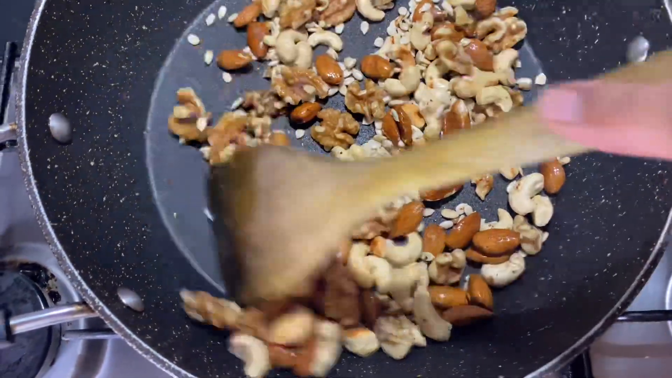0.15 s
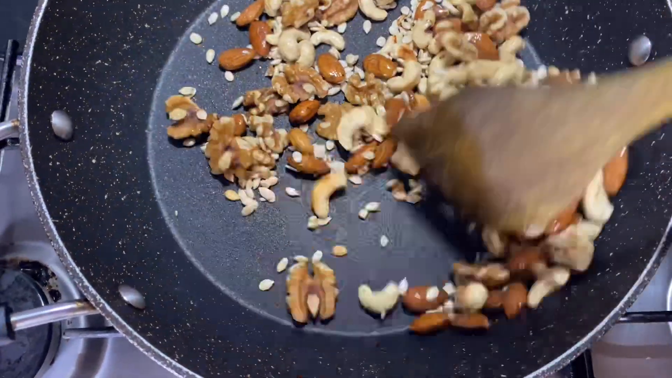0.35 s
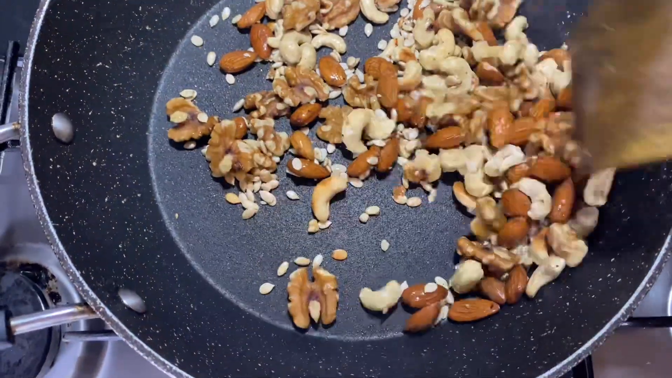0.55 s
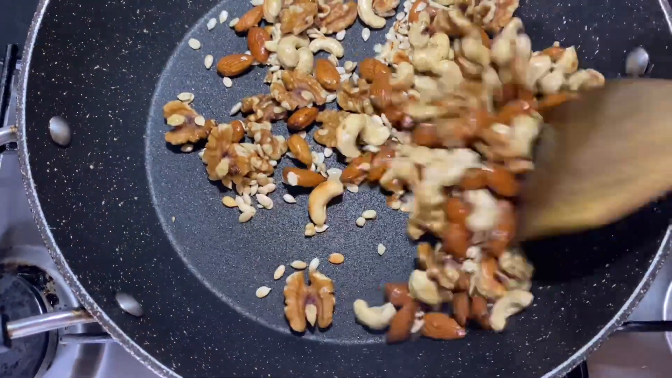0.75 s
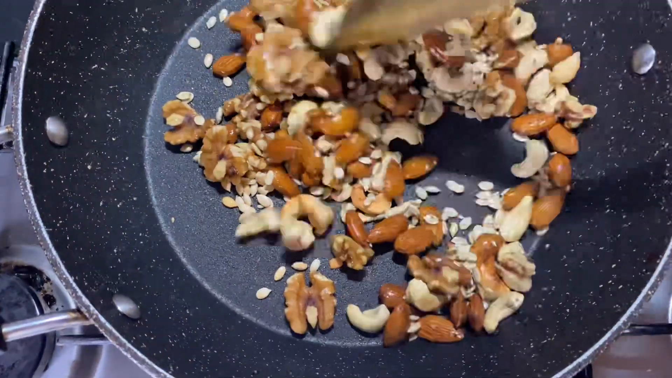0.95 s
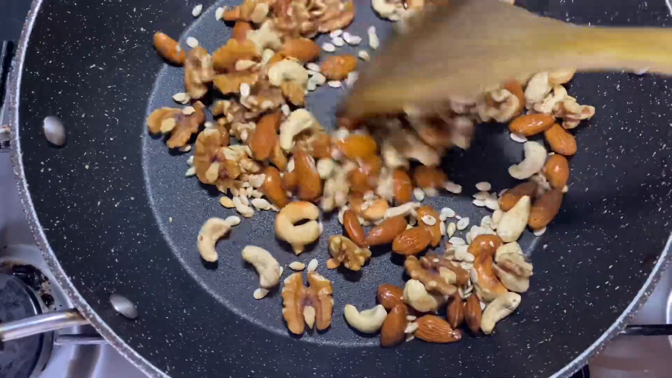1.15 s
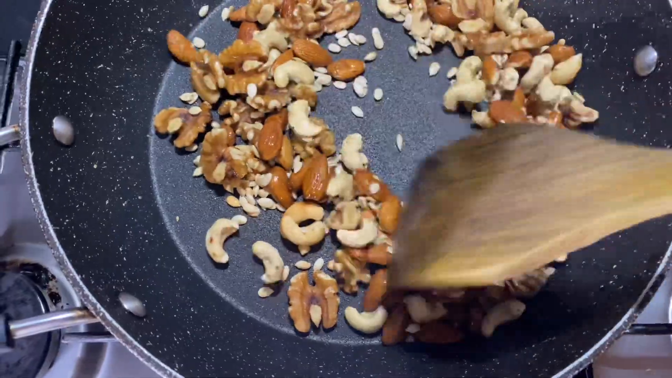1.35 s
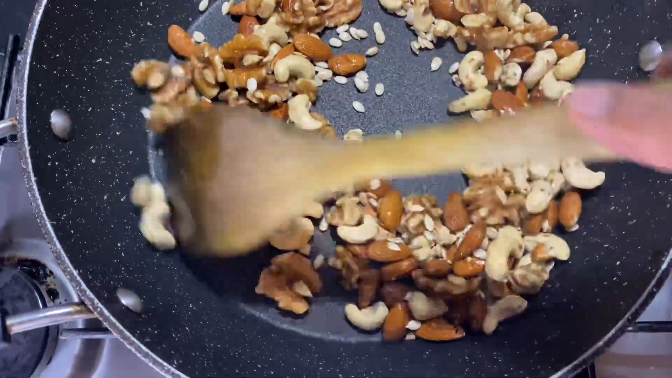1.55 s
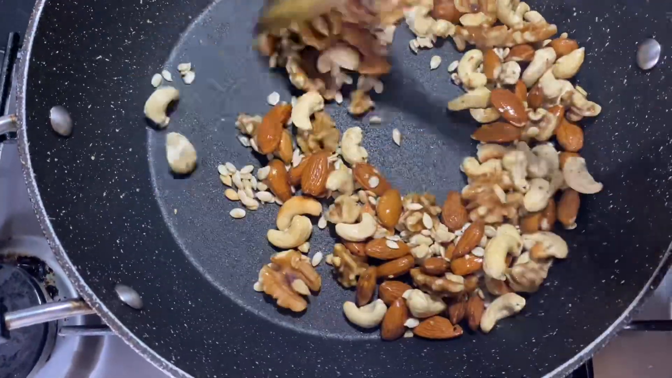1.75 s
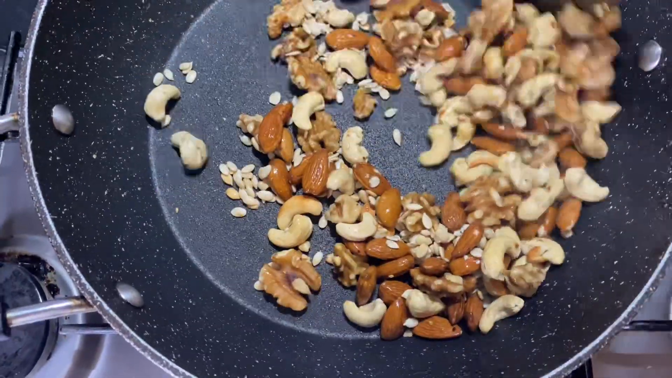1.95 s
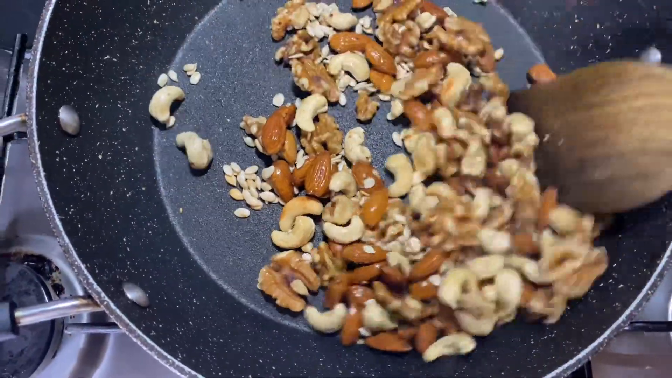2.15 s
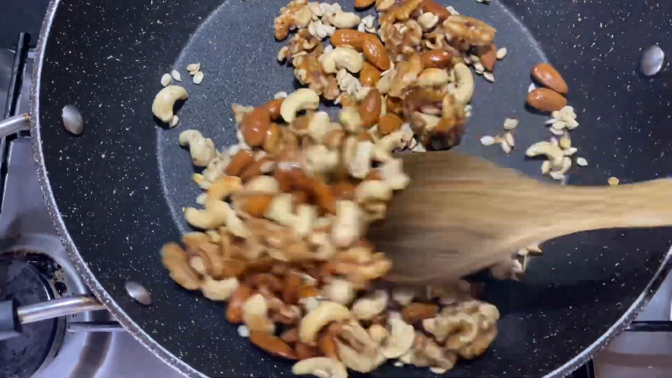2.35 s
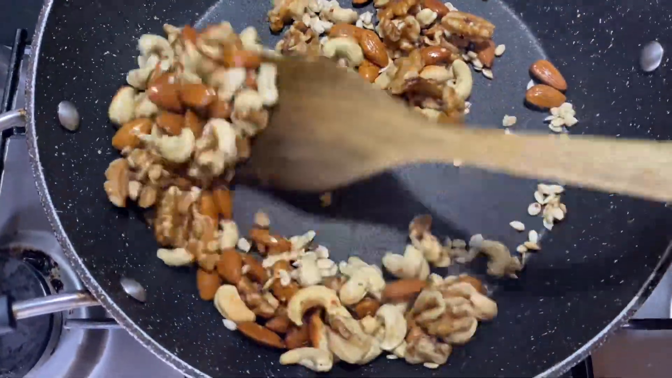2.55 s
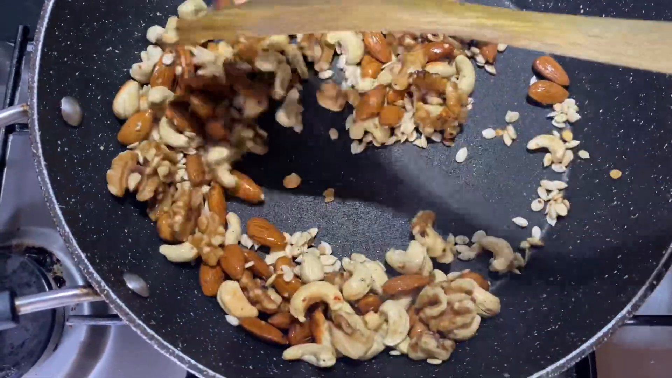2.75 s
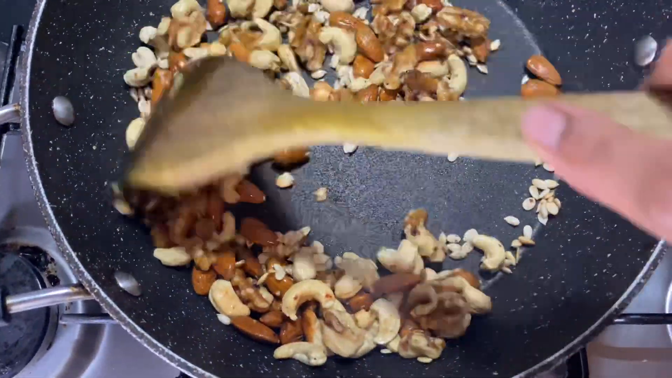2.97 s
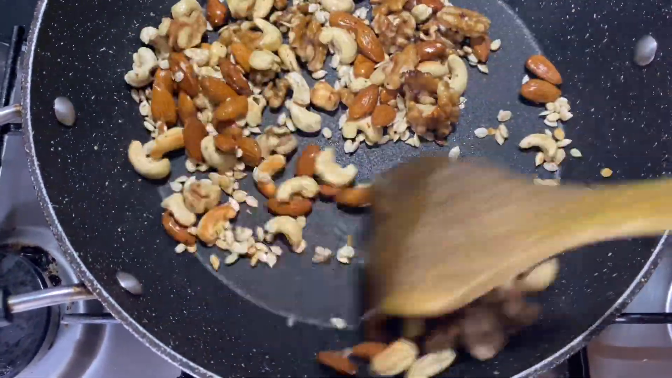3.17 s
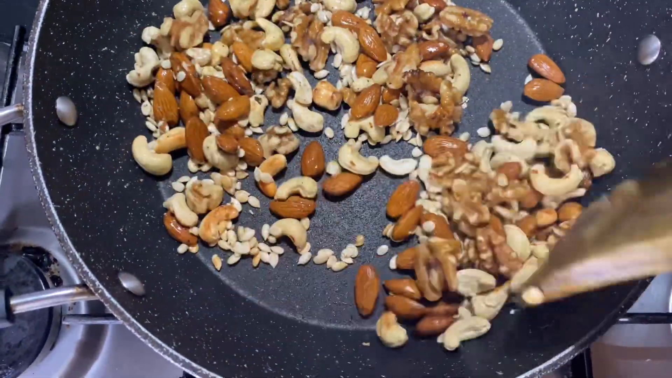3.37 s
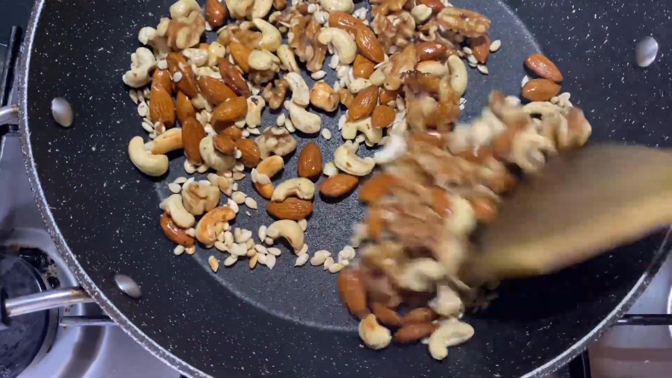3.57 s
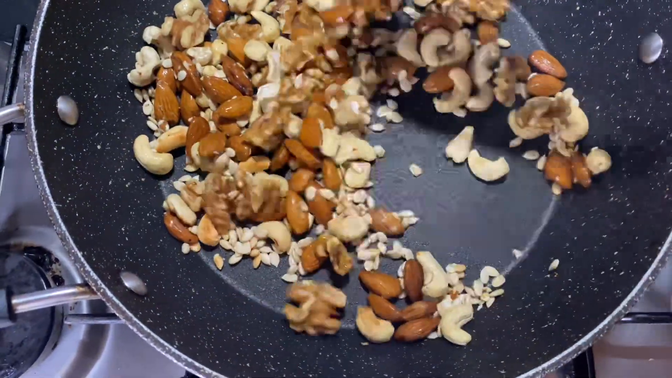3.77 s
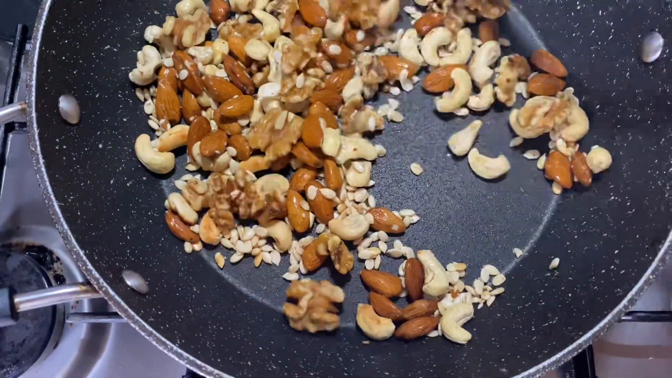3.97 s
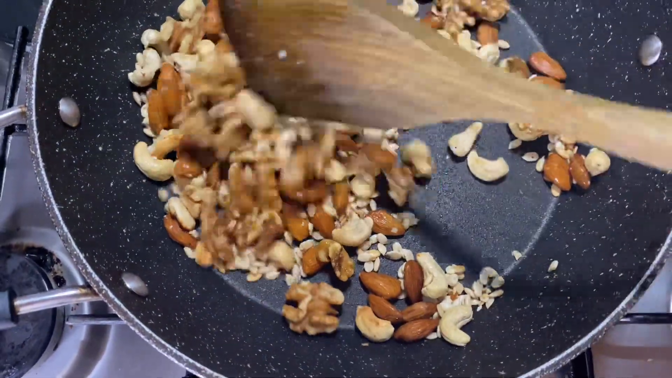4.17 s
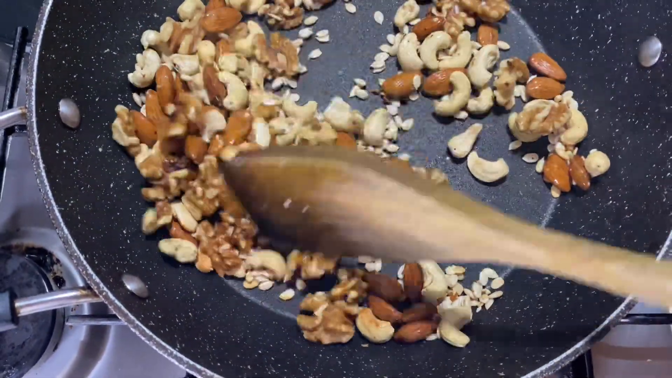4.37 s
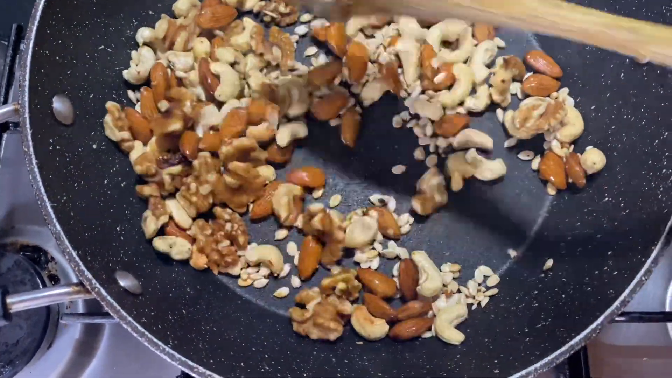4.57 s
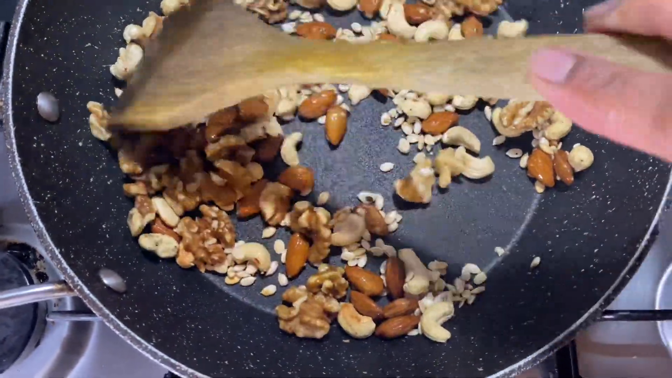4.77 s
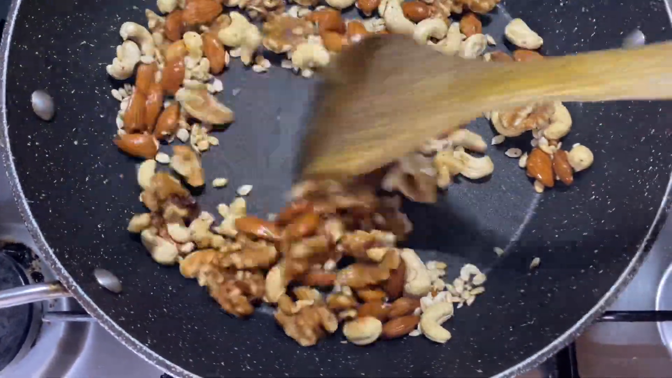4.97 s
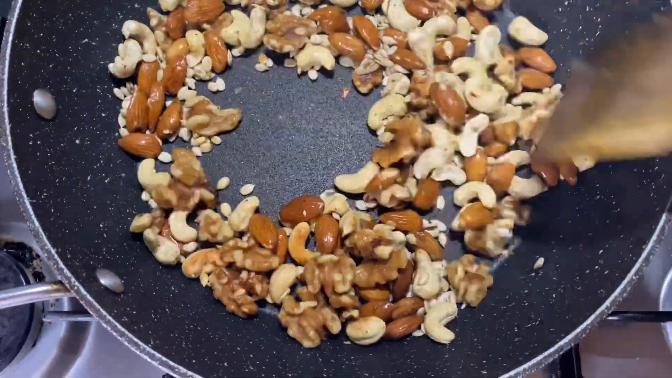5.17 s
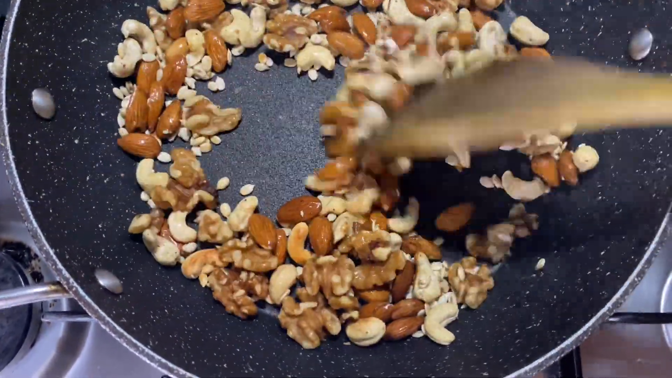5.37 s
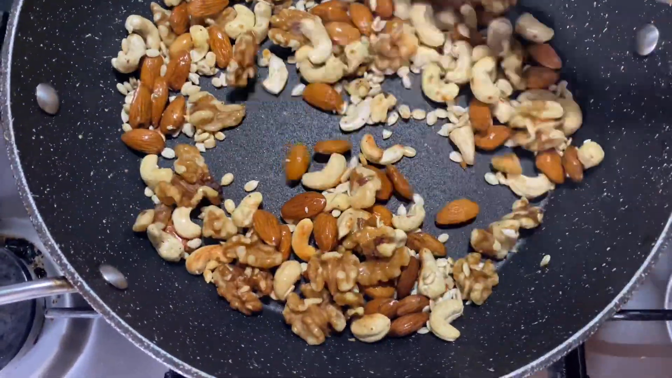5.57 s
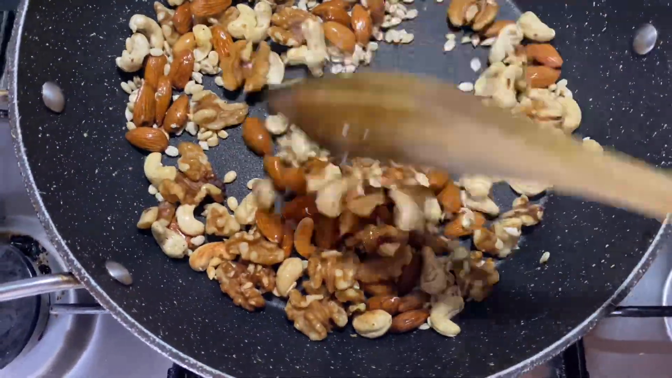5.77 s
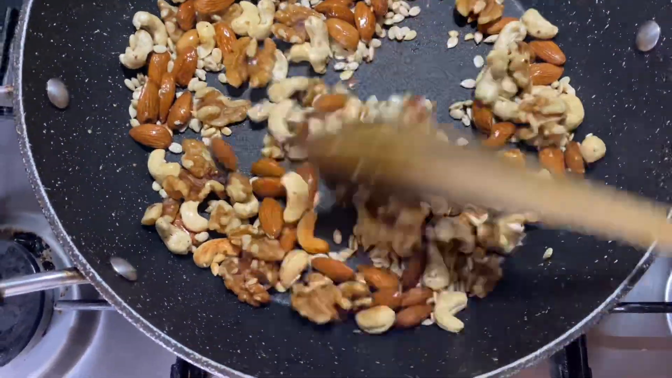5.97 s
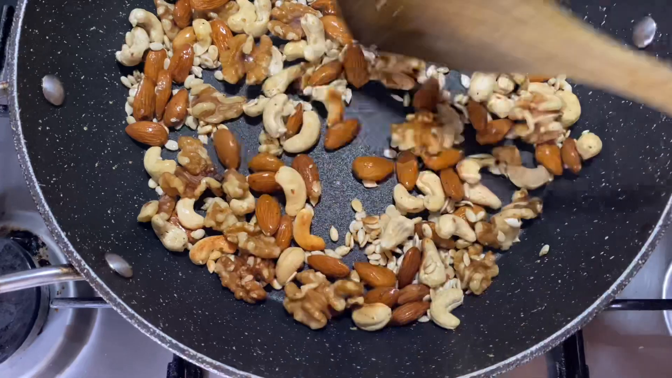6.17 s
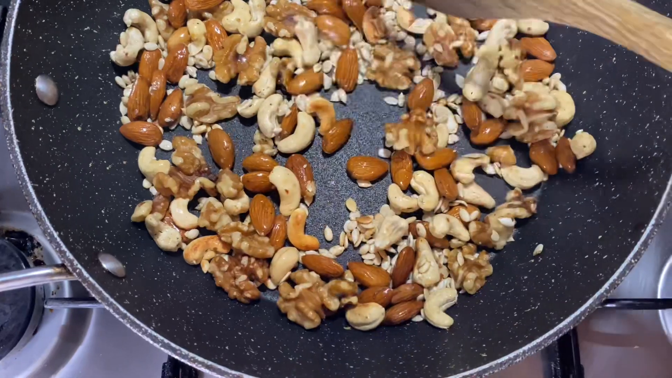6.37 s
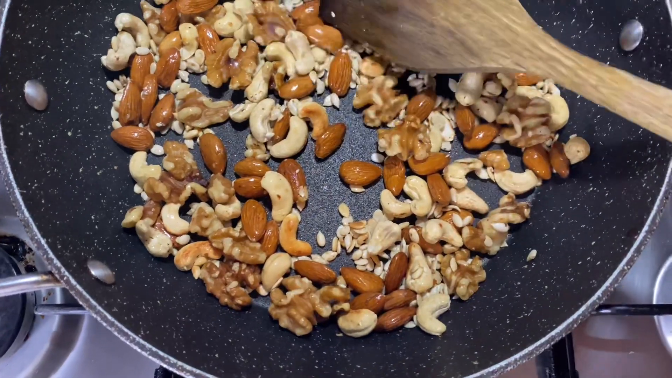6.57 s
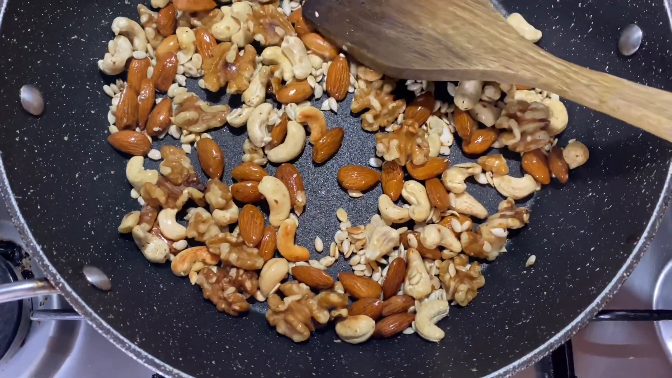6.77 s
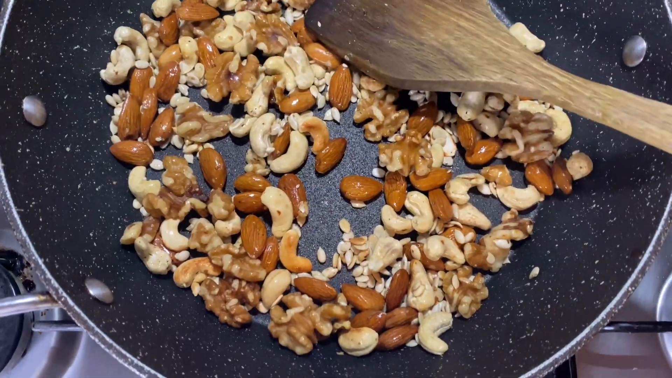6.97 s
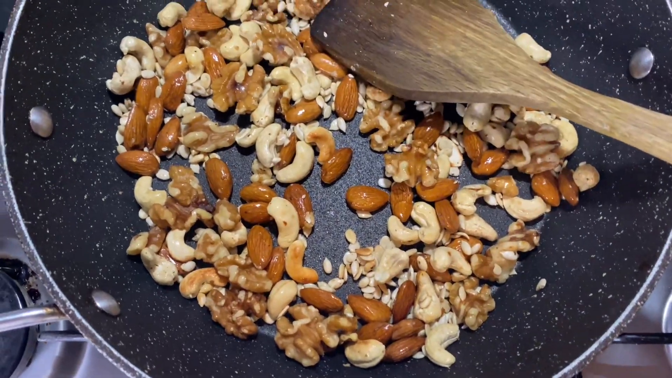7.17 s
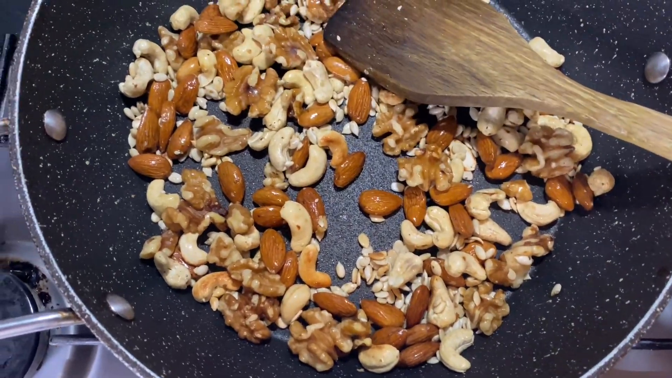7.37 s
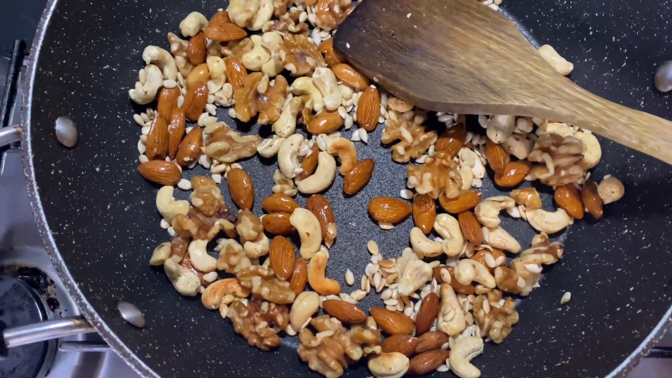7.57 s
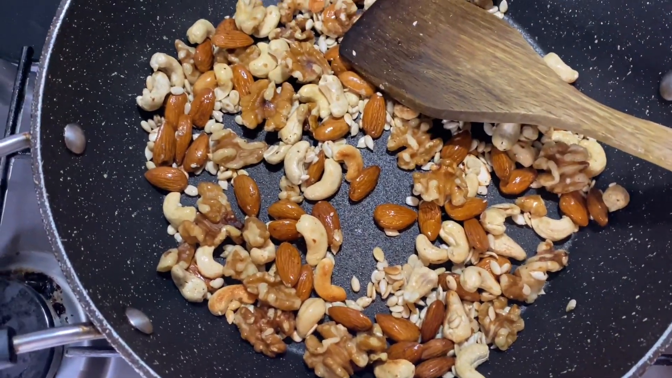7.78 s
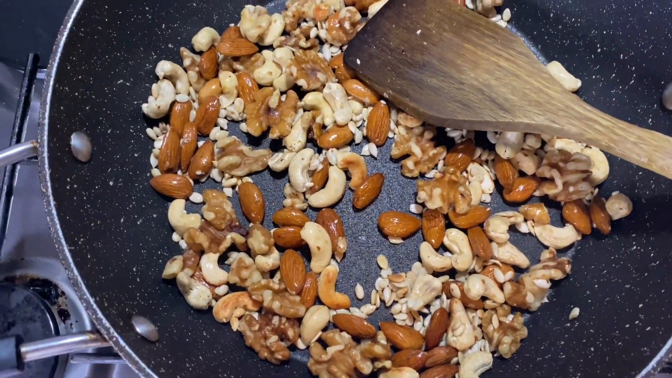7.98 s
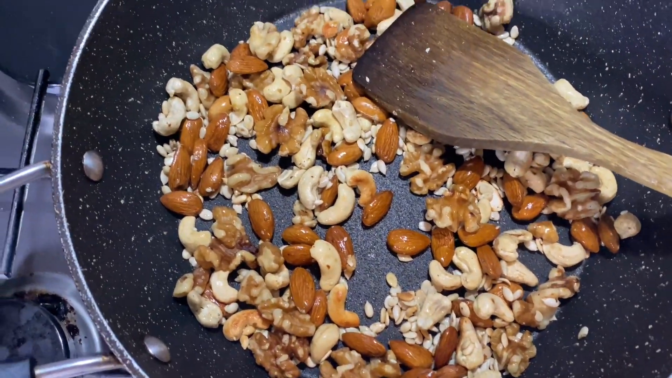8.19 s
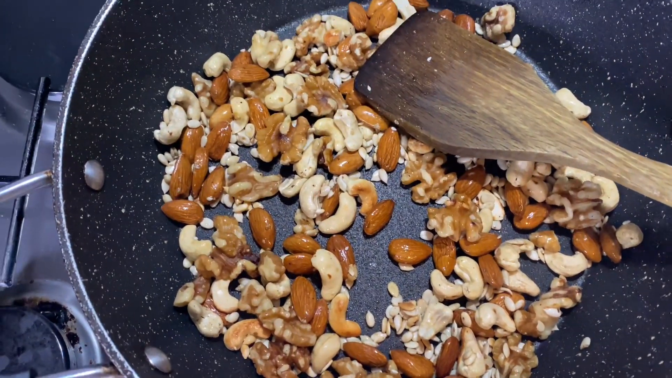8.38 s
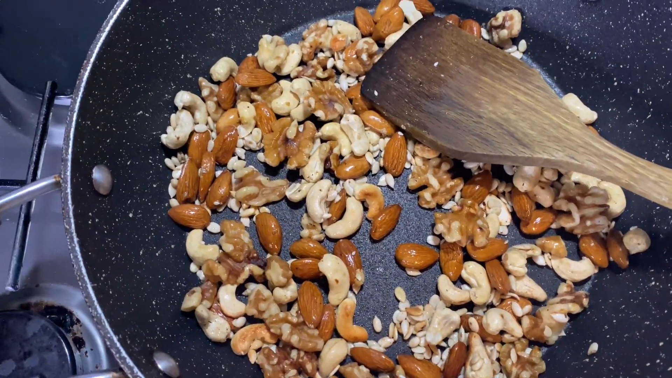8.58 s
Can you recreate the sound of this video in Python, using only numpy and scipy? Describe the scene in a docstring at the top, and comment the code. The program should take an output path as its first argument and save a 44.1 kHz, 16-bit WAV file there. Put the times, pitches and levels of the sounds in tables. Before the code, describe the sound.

Wood thuds and scrapes against a metal pan while hard nuts tumble and click together, heard very near with a short room echo. Busy stirring continues for over six seconds, with thin sizzling and tiny crackles. Several seeds pop with startlingly sharp, high cracks, the loudest overloading the microphone. Single nuts drop with hollow taps, the spatula is laid down, and only low rumble and faint hiss remain.

```python
"""In a small kitchen, close to a hot frying pan, a wooden spatula stirs nuts and seeds.
The spatula knocks as blows on the ringing modes of the pan; grains of contact make its scraping and the
tumbling nuts, while short hollow notes make single nuts land and click together. Dense tiny grains sizzle
faintly, noise bursts make crackles, sharp, bright seed snaps and two faint ticks; a low tone hums once.
A low rumble and thin hiss lie beneath; at the end the spatula is laid down in the pan."""
import sys
import numpy as np
from scipy import signal
from scipy.io import wavfile

SR = 44100
rng = np.random.default_rng(int(sys.argv[2]) if len(sys.argv) > 2 else 0)


def dump_mix(stems):
    """Bounce the given channels to the path in sys.argv[1] as a 16-bit WAV at rate SR."""
    frames = np.atleast_2d(stems).T  # one column per channel
    limited = np.clip(frames, -1, 1)  # hard clip at full scale
    pcm = np.round(limited * 32767).astype(np.int16)
    wavfile.write(sys.argv[1], SR, pcm)


N = 380583  # length of the scene in samples
AGE = np.arange(SR // 2) / SR  # time since a blow (s)
CUT_HZ = 16000  # upper limit of the recorded band

# Steady kitchen background. Each row: frequency in Hz, relative density in dB per Hz.
BACKGROUND_COLOUR = [(25, 11.5), (110, 4), (300, -0.5), (1000, -5), (2200, -9.5), (5000, -11), (9500, -8.5),
                     (12000, -4.5), (16000, -5.5)]
BACKGROUND_DB = -57.5
# Reverberation of the kitchen. Each row: frequency in Hz, decay time t60 in seconds.
KITCHEN_DECAY = [(100, .42), (500, .37), (2000, .36), (6000, .33), (12000, .31), (16000, .28)]

# Modes of the pan. Each row: frequency in Hz, decay time t60 in seconds, relative dB when struck on the
# floor, relative dB when struck on the wall.
PAN_MODES = [(116.8, 0.21, -14, -21), (146, 0.21, -16, -3), (305, 0.023, -6, -11.5), (526, 0.07, -1, 2),
             (553, 0.049, 2, -10), (620.7, 0.18, -4.5, -26), (722, .13, -10, -16.5), (835, 0.053, -10, 5),
             (932, .04, -18.5, -2), (1060, 0.19, -7.5, 1), (1114, .04, -9.5, -14), (1527, 0.15, -24, -3.5),
             (1528, .045, -21.5, -26.5), (1692, 0.09, -10, -12), (1858, 0.058, -13.5, -10),
             (2176, 0.13, -12.5, -55), (2280, .15, -23, -13), (2530, 0.22, -13, -24),
             (2550, 0.064, -23.5, -46), (2902, .05, -8.5, -43), (3244, 0.12, -34, -13),
             (3520, .04, -10.5, -16), (3960, 0.18, -18.5, -15), (4550, 0.15, -19.5, -33),
             (5585, 0.097, -22, -13.5)]
# Dead clatter of wood and nuts. Each row: frequency in Hz, relative density in dB per Hz.
CLATTER_COLOUR = [(40, -14), (130, -3), (210, -13.5), (330, 2), (600, 3.5), (1100, -3), (2000, -10),
                  (4000, -16.5), (7000, -20), (10000, -28), (16000, -25.5)]

# Strokes of the spatula through the heap. Each row: start in seconds, length in seconds,
# tumbling of the nuts in relative dB, initial pressure on the pan in relative dB.
STROKES = [(-.06, 0.42, -42.5, -42.5), (0.74, 0.2, -44.5, -44.5), (0.85, 0.045, -38.5, -34.5),
           (1.09, 0.22, -45.5, -54), (1.56, 0.65, -48.5, -46.5), (2.16, 0.37, -44, -48.5),
           (2.65, 0.14, -45.5, -62), (3.04, 0.28, -48.5, -50), (3.59, 0.14, -36, -37),
           (4.0, 0.13, -44, -44.5), (4.3, 0.38, -48, -57.5), (4.814, .25, -47, -51),
           (5.3, 0.51, -46, -50.5), (5.89, 0.26, -46, -52.5), (6.53, 0.32, -60.5, -57)]
# The blade digs in quickly; its pressure sags as the heap gives way; then the nuts come to rest.
DIG_S, SAG_DB_PER_S, REST_DB_PER_S = 0.045, 20, 113.5
# Relative scraping level at the usual effort of a stroke, and its growth in dB for each dB more.
SCRAPE_DB, USUAL_EFFORT_DB, SCRAPE_GROWTH = -58, -47, .7
# Colour of the blade's push on the pan. Each row: frequency in Hz, relative gain in dB.
PUSH_COLOUR = [(25, -7.5), (45, 10), (80, -8), (140, -4), (260, -0.5), (400, -9), (900, -40)]
# Colour of the tumbling nuts. Each row: frequency in Hz, relative gain in dB.
TUMBLE_COLOUR = [(120, -34), (280, -4.5), (450, -2), (1100, 2), (1800, -2), (3000, -22.5), (7000, -36)]
# Colour of wood and seeds scraping. Each row: frequency in Hz, relative gain in dB.
SCRAPE_COLOUR = [(500, -37.5), (1400, -17), (2500, -7.5), (5000, 4.5), (8000, 11), (11000, 8), (16000, 6)]
# Range of the notes with which hard nuts click together: lowest in Hz, highest in Hz.
NUT_RANGE_HZ = (1250, 4500)

# Sizzle, scraping hiss and crackles. Each row: frequency in Hz, relative density in dB per Hz.
FIZZ_COLOUR = [(1500, -25), (4000, -22), (7000, -11.5), (9800, -5.5), (11500, 0.5), (14000, 1.5),
               (16000, 1.5)]
# Small crackles of hot skins. Each row: start in seconds, level in dB.
CRACKLES = [(0.053, -44), (1.474, -41), (1.847, -40), (2.989, -43), (3.277, -46)]
# The steady sizzle, and the time from which it dies down.
SIZZLE_DB, FADE_FROM_S, FADE_DB_PER_S = -55.5, 5.33, 6
# Brief bright hiss of the spatula scraping over the pan. Each row: start in seconds, length in seconds,
# level in dB.
HISS_FLARES = [(0.81, .085, -43), (1.393, 0.1, -48.5)]
FLARE_RISE_S, FLARE_FADE_DB_PER_S = 0.038, 110

# Spatula knocks. Each row: start in seconds, level in dB before the band offsets, hardness as lift of the
# treble in dB, place from 0 on the nuts and pan floor to 1 on the bare wall, main note in Hz.
KNOCKS = [(0.081, -29.5, -16, 0, 335), (0.224, -36.5, -28, 0.76, 650), (0.7165, -32, 3.5, 0.83, 880),
          (0.876, -27, -13, 0, 550), (0.888, -24, -5, 0.099, 592), (0.917, -34, 1, 0, 560),
          (0.988, -36.5, -7, 0.3, 600), (1.086, -55.5, 22, 0.1, 670), (1.551, -42, 4.5, 0.78, 770),
          (1.589, -29, -2, 0, 1130), (2.165, -36, -3.5, 0, 527), (2.316, -28, 0, 0.41, 600),
          (2.354, -33, -1, 0.43, 574), (2.67, -52.5, 22.5, 0, 990), (3.037, -29, -10.5, 0.38, 612),
          (3.527, -29, -5, 0.75, 940), (3.649, -31, -11, 1, 460), (3.7118, -28.5, 6, 0.17, 640),
          (3.765, -33, -0.5, 0, 710), (3.947, -46, 3.5, 0.42, 1080), (3.995, -29.5, -11, 0.76, 567),
          (4.027, -26, -14.5, 0, 508), (4.051, -43, 9, 0.15, 560), (4.124, -35.5, -14, 0, 630),
          (4.322, -49.5, 6.5, 0.78, 860), (4.499, -44, 11.5, 0.38, 1070), (5.287, -27, 6.5, 0.99, 1520),
          (5.374, -42, 5.5, 0, 766), (5.5803, -46.5, 12.5, .2, 600), (6.068, -41, 4.5, 0.76, 617),
          (6.517, -49, 3.5, 0.51, 594), (6.69, -33.5, -2.5, 0.37, 565), (7.8412, -42.5, -1, 0.0053, 447)]
# Thump, body, clack and tick of a knock. Each row: low edge in Hz, high edge in Hz, offset in dB,
# share of the hardness from 0 to 1, level of the room in dB.
KNOCK_BANDS = [(60, 194, -20.5, 0.42, 6), (190, 1240, -5.5, 0, -3), (1350, 3000, -12, 0.85, -3.5),
               (2930, 14000, -18.5, 1, -11.5)]
NOTE_SHARPNESS, NOTE_DB = 6.6, 8  # Q of the favoured note, gain of the peak added there

# Single nuts landing. Each row: start in seconds, level in dB, note in Hz.
NUT_DROPS = [(1.061, -39.5, 615), (1.187, -39, 544), (1.435, -46, 783), (2.908, -48, 1080),
             (4.574, -47, 1070), (4.64, -47, 750), (5.027, -49, 1800), (5.485, -37, 573),
             (5.527, -41.5, 1200), (5.565, -38, 546), (5.614, -38, 550), (6.082, -37, 587),
             (6.135, -39.5, 560), (6.291, -45.5, 570), (6.529, -45.5, 573)]

# Sharp snaps of seeds, and two faint broad ticks. Each row: start in seconds, snap level in dB,
# level in dB of the broad noise burst with it, lowest frequency of that burst in Hz.
SNAPS_AND_TICKS = [(2.7198, -9.5, -20.5, 2000), (4.85, -41, -48, 900), (5.0690, -2, -19, 45),
                   (5.661, -43, -46, 1500), (5.7754, -18.5, -29, 700), (5.7868, -17.5, -21.5, 700),
                   (5.9718, -14, -34, 500)]
# Bright snap. Each row: frequency in Hz, relative density in dB per Hz.
SNAP_COLOUR = [(200, -52), (1000, -39.5), (2500, -20.5), (5000, -12.5), (7000, -5), (9500, -1.5),
               (11500, 3), (14500, -0.5), (16000, 1.5)]
# Broad burst with the snap. Each row: frequency in Hz, relative density in dB per Hz.
BROAD_COLOUR = [(60, 4), (300, 4), (850, -2), (1300, -3.5), (2200, -2), (6000, 2), (10000, -2),
                (16000, -25)]

# A low hum of the pan: start in seconds, length in seconds, level in dB, note in Hz.
PAN_BOOM = (3.78, .06, -40, 115)


def gain_of(db):
    """Decibels to amplitude."""
    return 10 ** (np.asarray(db) / 20)


def evened(x, span=None):
    """Scales to rms 1, over the whole sound or over its first span seconds."""
    head = x if span is None else x[:round(span * SR)]
    return x / np.sqrt(np.mean(head ** 2) + 1e-20)


def unit(x):
    """Scales to energy 1."""
    return x / np.linalg.norm(x)


def read(points, hz):
    """Reads a table on a log-frequency axis."""
    table_hz, value = np.transpose(points)
    return np.interp(np.log(hz + 1), np.log(table_hz + 1), value)


def through(x, response):
    """Convolves and keeps the length."""
    return signal.oaconvolve(x, response)[:len(x)]


def colour(x, points, size=4096):
    """Minimum-phase filter with the given spectrum, so that attacks stay sharp."""
    hz = abs(np.fft.fftfreq(size, 1 / SR))
    log_gain = np.log(gain_of(read(points, hz)))
    spectrum = np.exp(np.conj(signal.hilbert(log_gain)))
    response = np.fft.ifft(spectrum).real[:size // 2]
    return through(x, response)


def band(x, lo, hi):
    """Causal band-pass."""
    return signal.sosfilt(signal.butter(3, [lo, hi], "band", fs=SR, output="sos"), x)


def add(mix, s, sound):
    """Mixes a sound in at time s."""
    part = mix[round(s * SR):][:len(sound)]
    part += sound[:len(part)]


def dying(t60):
    """Exponential decay by 60 dB in t60 seconds."""
    return np.exp(-np.log(1000) * AGE / t60)


def burst(t60):
    """A dense cluster of dying reflections, energy 1."""
    return unit(rng.standard_normal(len(AGE)) * dying(t60))


def grains(per_s, spread_db):
    """Random tiny contacts: most are weak, a few stand out."""
    sizes = gain_of(spread_db * np.minimum(rng.exponential(1, N), 4))
    signs = rng.choice([-1, 1], N)
    happens = rng.random(N) < per_s / SR
    return evened(sizes * signs * happens)


def swell(start, length, rise_s, fade_db_per_s):
    """Attack, hold and release, as a gain for every sample."""
    t = np.arange(N) / SR - start
    return np.clip(t / rise_s, 0, 1) * gain_of(-fade_db_per_s * np.maximum(t - length, 0))


def tail():
    """The room's answer to a click, energy 1: it builds up, then dies at a rate set by frequency."""
    hz, t, z = signal.stft(rng.standard_normal(len(AGE)), SR, nperseg=256)
    decay = np.exp(-np.log(1000) * t / read(KITCHEN_DECAY, hz)[:, None])
    echoes = signal.istft(z * decay, SR, nperseg=256)[1]
    return unit(echoes[:len(AGE)] * (1 - np.exp(-AGE / .005)))


def kitchen(wet_db):
    """Direct sound followed by the room."""
    return signal.unit_impulse(len(AGE)) + gain_of(wet_db) * tail()


def pan(wall, clatter_db, clatter_t60):
    """One blow: the pan's modes, weighted by where it is hit, and the dead clatter of what hits it."""
    hz, t60, floor_db, wall_db = np.transpose(PAN_MODES)[:, :, None]
    chance = rng.standard_normal((3, len(PAN_MODES), 1))
    mode_db = floor_db + wall * (wall_db - floor_db) + 3.7 * chance[0]
    heights = gain_of(mode_db) * np.sign(chance[1]) / np.sqrt(t60)
    # the shifting weight of the nuts detunes the floor
    loaded_hz = hz * (1 + .009 * (1 - wall) * chance[2])
    # the ring takes a few ms to spread through the pan
    spreading = 1 - np.exp(-AGE / .0025)
    ring = spreading * (heights * dying(t60) * np.sin(2 * np.pi * loaded_hz * AGE)).sum(0)
    clatter = unit(colour(burst(clatter_t60), CLATTER_COLOUR))
    return unit(ring) + gain_of(clatter_db) * clatter


def clack(hz, turns, detune=0.051):
    """A nut's short hollow note: two close tones that die within a number of cycles."""
    tones = np.zeros(len(AGE))
    for height in (1, .5):
        tone_hz = hz * (1 + detune * rng.uniform(-1, 1))
        tones += height * np.sin(2 * np.pi * tone_hz * AGE)
    return unit(tones * dying(turns / hz) * (1 - np.exp(-AGE * hz)))


def background():
    """Low room rumble and a thin steady hiss, as coloured noise."""
    return gain_of(BACKGROUND_DB) * evened(colour(rng.standard_normal(N), BACKGROUND_COLOUR))


def strokes():
    """How strongly the blade pushes on the pan, tumbles the nuts and scrapes, through all its strokes."""
    push, tumble, scrape = np.zeros((3, N))
    for start, length, tumble_db, pressure_db in STROKES:
        motion = swell(start, length, DIG_S, REST_DB_PER_S)
        sag_db = SAG_DB_PER_S * np.clip(np.arange(N) / SR - start, 0, length)
        push = np.maximum(push, motion * gain_of(pressure_db - sag_db))
        tumble = np.maximum(tumble, motion * gain_of(tumble_db))
        effort_db = (tumble_db + pressure_db) / 2
        scrape_db = SCRAPE_DB + SCRAPE_GROWTH * (effort_db - USUAL_EFFORT_DB)
        scrape = np.maximum(scrape, motion * gain_of(scrape_db))
    return push, tumble, scrape


def stirring(push, tumble, scrape, count=3):
    """The blade shoves the heap: nuts tumble on several spots of the pan, wood and seeds scrape over it."""
    # a hard shove sets many nuts moving at once; in a gentle one they fall singly
    contacts_per_s = 35 + 260 * tumble / tumble.max()
    out = np.zeros(N)
    for spot in range(count):
        contacts = evened(grains(contacts_per_s / count, spread_db=2.5) / np.sqrt(contacts_per_s))
        rubbing = contacts + gain_of(-6.5) * grains(per_s=1300, spread_db=5.5)
        body = through(pan(0, clatter_db=-4, clatter_t60=0.019), kitchen(wet_db=-6.0))
        out += gain_of(1) * through(contacts * push, unit(colour(body, PUSH_COLOUR)))
        out += gain_of(0.47) * through(contacts * tumble, unit(colour(body, TUMBLE_COLOUR)))
        out += gain_of(-1.0) * through(rubbing * scrape, unit(colour(body, SCRAPE_COLOUR)))
    return out / np.sqrt(count)


def jostling(scrape, count=12):
    """Nuts of many sizes click against each other wherever the blade scrapes through them."""
    out = np.zeros(N)
    for hz in np.geomspace(*NUT_RANGE_HZ, count):
        click = clack(hz, turns=9)[:SR // 25]
        out += through(grains(per_s=9, spread_db=2.5) * scrape, click)
    return gain_of(-6.5) * through(out, kitchen(wet_db=-5.0)) / np.sqrt(count)


def hiss_strength():
    """Strength of the high hiss: steady sizzle, later slowly dying down, and brief flares of scraping hiss."""
    fading_s = np.maximum(np.arange(N) / SR - FADE_FROM_S, 0)
    steady = gain_of(SIZZLE_DB - FADE_DB_PER_S * fading_s)
    flares = np.zeros(N)
    for start, length, db in HISS_FLARES:
        flares += gain_of(db) * swell(start, length, FLARE_RISE_S, FLARE_FADE_DB_PER_S)
    return np.hypot(steady, flares)


def sizzle():
    """Countless tiny grains make the sizzle and the flares of scraping hiss; distinct crackles lie on top."""
    fine_grains = through(grains(per_s=4500, spread_db=3.5), kitchen(wet_db=-9.0))
    out = evened(colour(fine_grains, FIZZ_COLOUR)) * hiss_strength()
    for s, db in CRACKLES:
        crackle = colour(burst(0.041) + gain_of(-2.5) * tail(), FIZZ_COLOUR)
        add(out, s, gain_of(db) * evened(crackle, span=0.012))
    return out


def knocks():
    """The spatula meets the pan: blows toward the bare wall bring in its modes and less dead clatter."""
    out = np.zeros(N)
    for s, db, hardness_db, wall, note_hz in KNOCKS:
        blow = pan(wall, clatter_db=3 - 6 * wall, clatter_t60=.095)
        # the spot that is struck favours one region of the pan's modes
        note_filter = signal.iirpeak(note_hz, NOTE_SHARPNESS, fs=SR)
        blow = blow + gain_of(NOTE_DB) * signal.lfilter(*note_filter, blow)
        echoes = through(blow, tail())
        for lo, hi, band_db, share, room_db in KNOCK_BANDS:
            part = band(blow + gain_of(room_db) * echoes, lo, hi)
            part_db = db + band_db + share * hardness_db
            add(out, s, gain_of(part_db) * evened(part, span=.1))
    return out


def drops():
    """Single nuts land: low notes are the clear drum of the pan floor, high ones nut on nut with more clatter."""
    out = np.zeros(N)
    for s, db, hz in NUT_DROPS:
        # the blow on the pan grows with the note, up to 0 dB
        spill_db = min(-12 + 13 * np.log2(hz / 550), 0)
        spill = gain_of(spill_db) * pan(0, clatter_db=-5, clatter_t60=.04)
        landing = through(clack(hz, turns=27, detune=.03) + spill, kitchen(wet_db=-9))
        add(out, s, gain_of(db) * evened(landing, span=.025))
    return out


def snaps_and_ticks():
    """Seed snaps and faint ticks: a sharp front, quickly dying reflections inside the pan, then the room."""
    out = np.zeros(N)
    for s, snap_db, broad_db, lowest_hz in SNAPS_AND_TICKS:
        # part of the snap is thrown back by the pan wall
        bounce = np.roll(burst(.02), round(.0026 * SR))
        bright_front = .55 * burst(.003) + burst(.05) + .55 * bounce
        snap = colour(bright_front + gain_of(-8) * tail(), SNAP_COLOUR)
        broad_front = .7 * burst(0.0024) + burst(0.036)
        broad = band(colour(broad_front + gain_of(-8) * tail(), BROAD_COLOUR), lowest_hz, CUT_HZ)
        add(out, s, gain_of(snap_db) * evened(snap, span=.01))
        add(out, s, gain_of(broad_db) * evened(broad, span=.01))
    return out


def boom():
    """The whole pan hums briefly at a low note: a sine that swells and dies fast."""
    start, length, db, hz = PAN_BOOM
    note = evened(np.sin(2 * np.pi * hz * np.arange(N) / SR))
    return gain_of(db) * swell(start, length, rise_s=0.033, fade_db_per_s=220) * note


def scene():
    """Everything at the microphone close to the pan."""
    push, tumble, scrape = strokes()
    stirred = stirring(push, tumble, scrape) + jostling(scrape)
    struck = knocks() + drops() + boom()
    bright = sizzle() + snaps_and_ticks()
    return (background() + stirred + struck + bright)[None]


def record(dry):
    """The loudest snaps overload the input; then the band limit."""
    clipped = np.clip(dry, -1, 1)
    low_pass = signal.firwin(511, CUT_HZ, window=("kaiser", 8), fs=SR)
    return signal.oaconvolve(clipped, low_pass[None], "same")


dry = scene()
out = record(dry)
dump_mix(out)
```